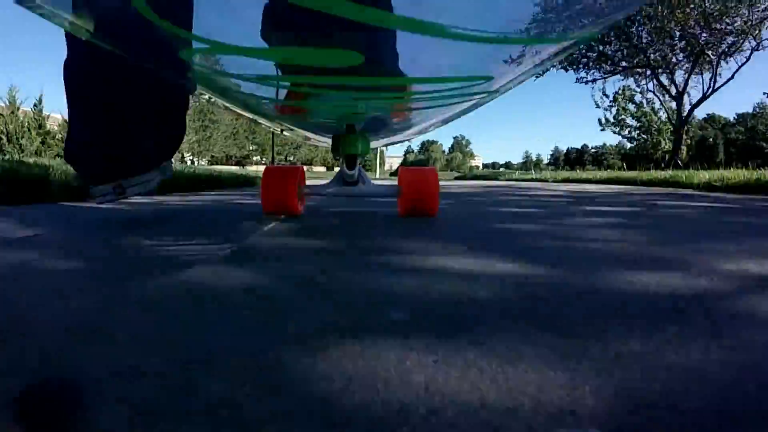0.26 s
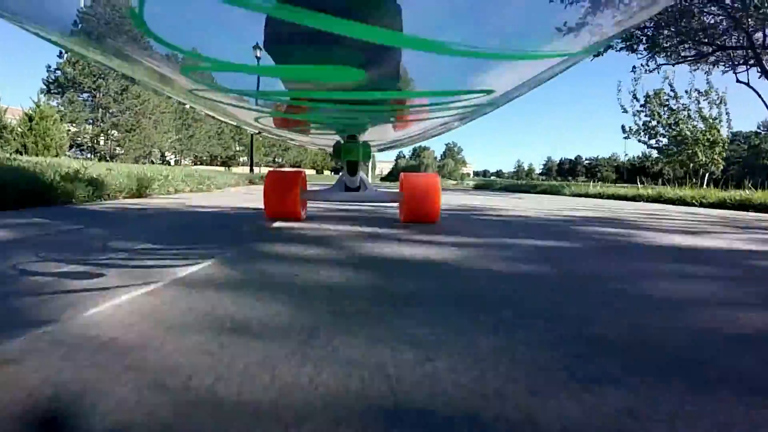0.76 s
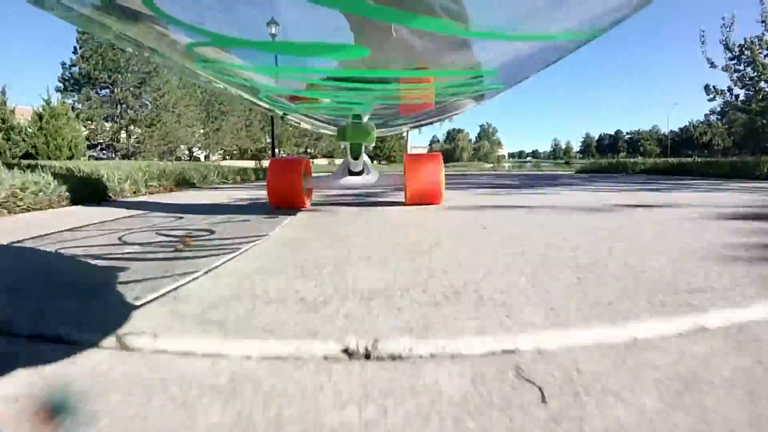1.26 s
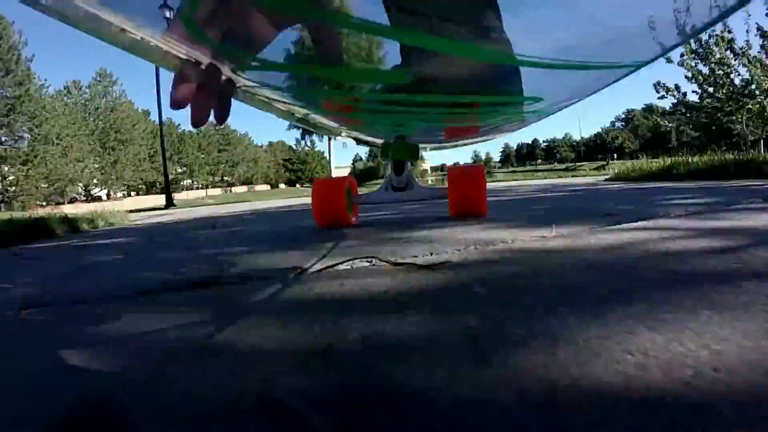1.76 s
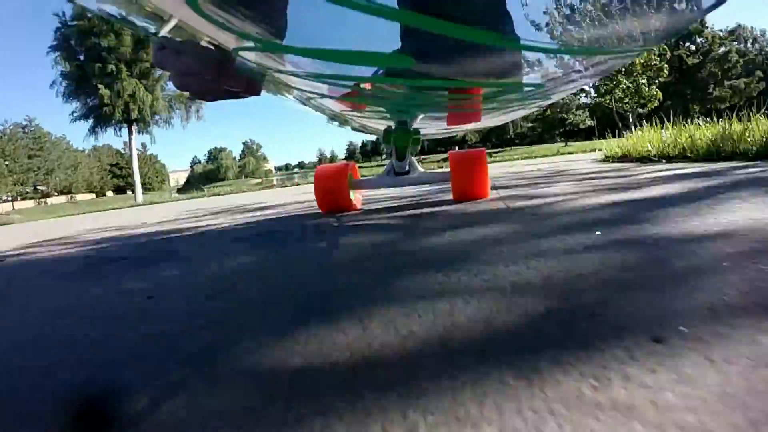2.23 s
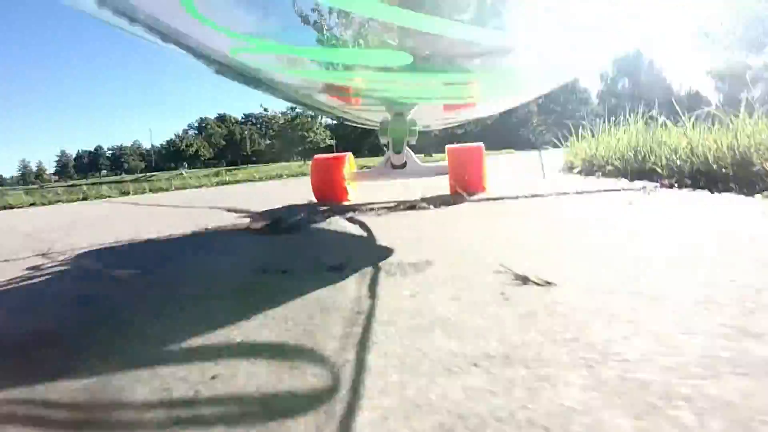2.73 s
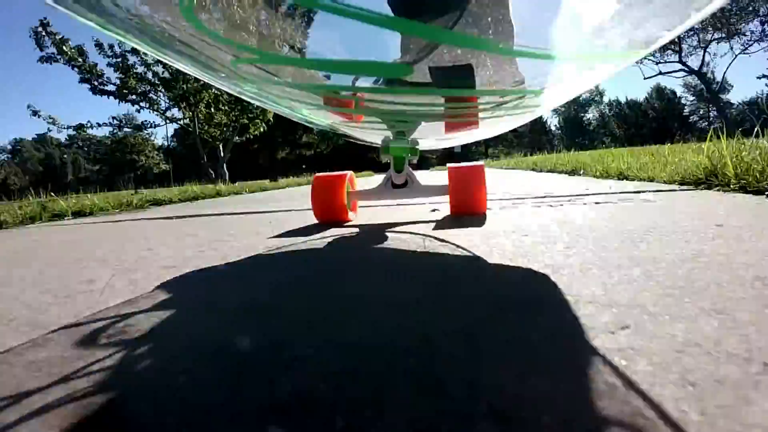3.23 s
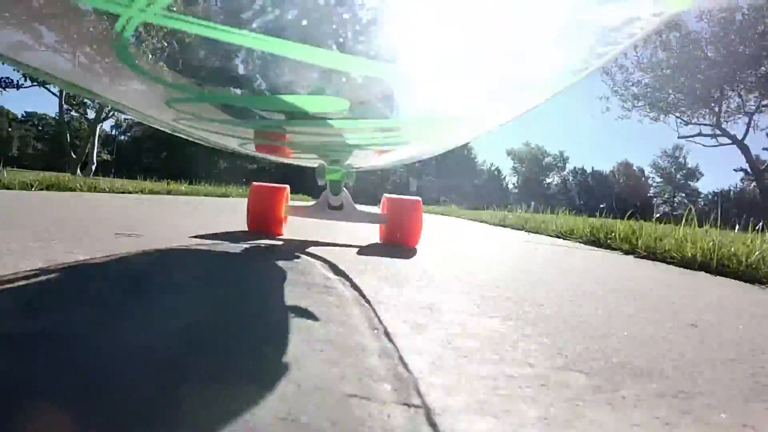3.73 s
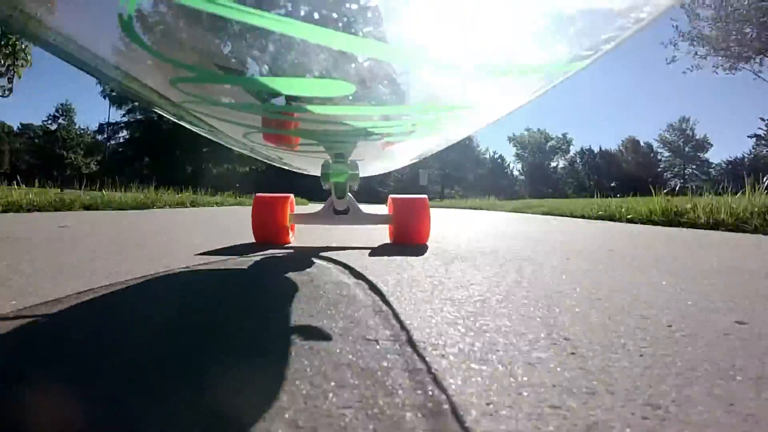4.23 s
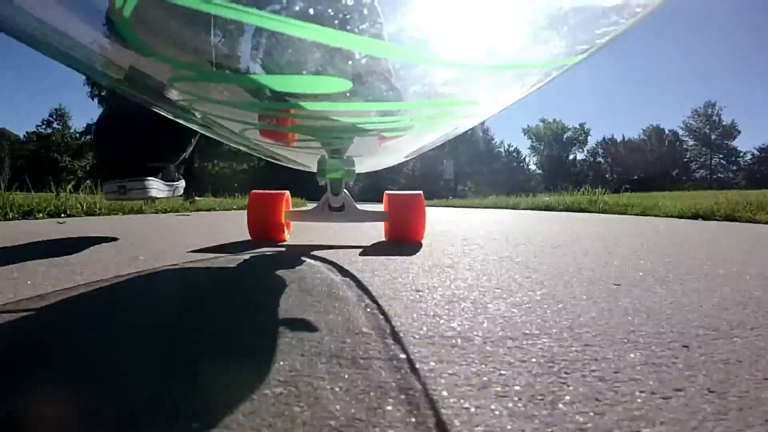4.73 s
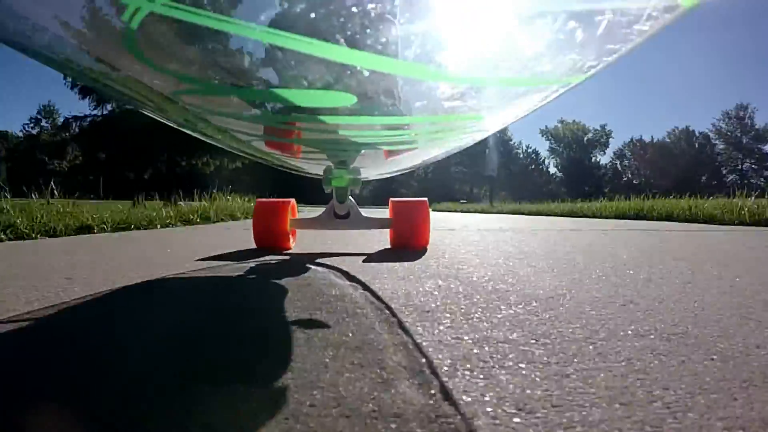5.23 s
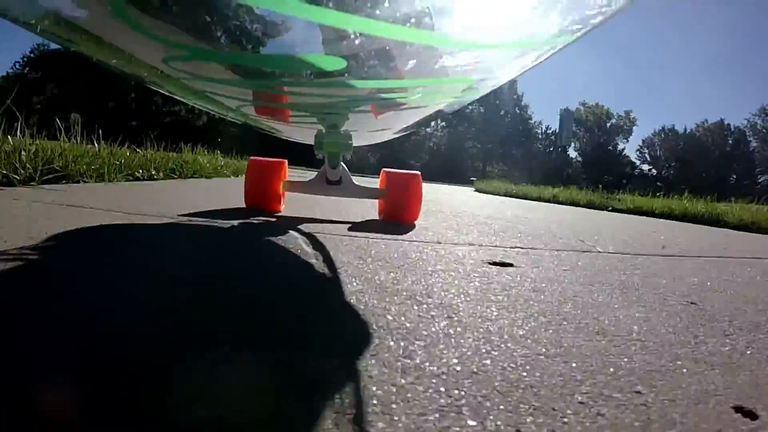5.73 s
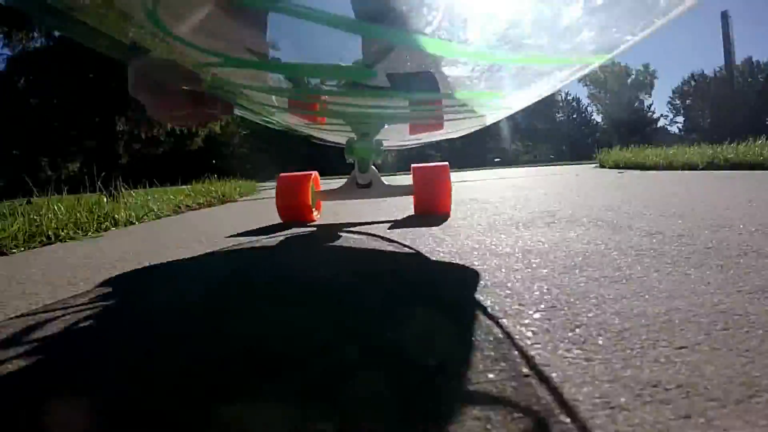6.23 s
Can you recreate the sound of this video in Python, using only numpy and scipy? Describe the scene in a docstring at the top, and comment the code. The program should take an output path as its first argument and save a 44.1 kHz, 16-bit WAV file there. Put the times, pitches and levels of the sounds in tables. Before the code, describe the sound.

A small camera clamped beneath a longboard hears hard wheels on slabbed concrete through the deck. At 0 seconds loose hardware clatters with a thump; a double blow lands around 0.26 and the roughly 225 hertz hum briefly climbs. Lumpy low rumble swells near 0.6, with thumps at 0.65 and 0.86. A faint, hoarse rising squeal passes at 1.0, joints hit at 1.2 and 1.4, and the hardest thump comes at 1.93. Tiny stones crack around 2.3-2.4 as grit hiss grows. Heavy knocks follow near 2.8, 3.0, 3.4 and 3.55, then a fainter, lower squeal at 3.7. Thuds resume at 4.0, a small stone ticks at 4.2, and knocks continue irregularly through 5.2, 5.9 and 6.3. Dry metallic clicks accompany impacts, with rapid chatter between. Rolling continues until about 6.5; blows clip and briefly duck everything.

```python
"""A longboard's hard wheels on slabbed concrete, from a small camera clamped under the deck, hearing all through it.
It opens on a clatter of loose hardware and a thump; a double blow follows at a quarter second and the hum rises.
A squeal follows at one second and the hardest thump near two; stones crack soon after, with a lower squeal
before four seconds and one more stone after it. Throughout, rough ground drums the deck and grit hisses;
joints thump it, loose hardware clicks and bounces, and the camera ducks under heavy blows and clips the peaks."""
import sys
import numpy as np
from scipy import signal
from scipy.fft import rfft, irfft, next_fast_len
from scipy.io import wavfile
from scipy.ndimage import map_coordinates

SR = 44100
rng = np.random.default_rng(int(sys.argv[2]) if len(sys.argv) > 2 else 0)


def wav_record(signal):
    """Record a signal, one row per channel, as 16-bit PCM in the file named by sys.argv[1]."""
    frames = np.transpose(np.atleast_2d(signal))
    bounded = np.clip(frames, -1, 1)
    # unit amplitude maps onto the largest positive 16-bit level
    quanta = np.round(bounded * 32767).astype(np.int16)
    wavfile.write(sys.argv[1], SR, quanta)


def volts_from_decibels(level):
    """Turn decibel levels (scalar or array-like) into linear amplitude factors."""
    exponent = np.asarray(level, float) / 20
    return 10 ** exponent


N = 285327


def unit(x):
    """Scales a signal to rms 1."""
    return x / np.sqrt(np.mean(x ** 2) + 1e-20)


def wobble(rate):
    """A smooth random curve with this many knots a second."""
    knots = rng.standard_normal(int(N * rate / SR) + 4)
    return map_coordinates(knots, [np.arange(N) * rate / SR])


def narrow(hz, width_hz):
    """Noise of rms 1 in a narrow band whose centre follows hz."""
    phase = 2 * np.pi * np.cumsum(hz) / SR
    return unit(wobble(width_hz) * np.cos(phase) + wobble(width_hz) * np.sin(phase))


def filtered(x, response):
    """Applies a complex response of frequency."""
    size = next_fast_len(N + SR // 2)
    return irfft(rfft(x, size) * response(np.fft.rfftfreq(size, 1 / SR)), size)[:N]


def placed(times, shapes):
    """Sums rows of samples at their start times."""
    index = np.round(np.asarray(times) * SR).astype(int)[:, None] + np.arange(shapes.shape[1])
    return np.bincount(np.clip(index, 0, N).ravel(), shapes.ravel(), N + 1)[:N]


def curves(rows):
    """Draws each column of a table over time, a value per sample."""
    s, *columns = np.transpose(rows)
    return [np.interp(np.arange(N) / SR, s, column) for column in columns]


# resonances of the deck over the camera: (frequency [Hz], width [Hz], level [dB])
DECK_MODES = [(45.4, 89, -17.5), (80.3, 31, -3), (108.6, 51.6, -3.5), (192.3, 79.3, -2.5), (348, 109, -8),
              (467, 78, -8.5), (778, 410, -20)]


def deck(f):
    """Causal sum of the deck's resonances; the heavy deck passes little treble."""
    modes = 0
    for k, (centre, width, db) in enumerate(DECK_MODES):
        band = 1j * f * width
        modes = modes + (-1) ** k * volts_from_decibels(db) * band / (centre ** 2 - f ** 2 + band)
    return modes / (1 + 1j * f / 1500) ** 2


def thud(times, db, push):
    """Pushes on the deck; a one-sample push of height 1 makes it swing to a peak of db."""
    peak = np.abs(filtered(np.ones(1), deck)).max()
    return filtered(placed(times, volts_from_decibels(db)[:, None] * push), deck) / peak


# what struck hardware rings with: (frequency [Hz], level [dB], time to fall 60 dB [s])
HARDWARE_MODES = [(792, 2, 0.014), (1177, 9.5, 0.0019), (1875, 1, 0.0059), (2395, -6, 0.0068),
                  (3150, 9, 0.0025), (4050, -0.5, 0.0045), (5253, -2.5, 0.0094), (7150, -11.5, 0.009),
                  (10660, -9, 0.0055), (15000, -17, 0.0024)]


def strikes(times, db, hard_db=0, size=500):
    """Each strike rings the hardware at its own pitches and strengths; soft ones touch longer and lose outer modes."""
    t = np.arange(size) / SR
    hz, mode_db, t60 = np.transpose(HARDWARE_MODES)
    chance = rng.standard_normal((len(times), 2, len(hz)))
    force_db = np.minimum(db + hard_db, 3)  # sets tone, not level
    octaves = np.log2(hz / 2500)
    dulling = .7 * np.maximum(octaves, 0) + .45 * np.maximum(-octaves, 0)
    soft_db = np.outer(np.minimum(force_db, 0), dulling)
    level = volts_from_decibels(db[:, None] + mode_db + soft_db + 3.3 * chance[:, 0])
    pitch = hz * np.exp(.08 * chance[:, 1])
    ring = 0
    for k in range(len(hz)):
        tone = np.sin(2 * np.pi * np.outer(pitch[:, k], t))
        ring = ring + (-1) ** k * level[:, k, None] * volts_from_decibels(-60 * t / t60[k]) * tone
    contact_s = .00006 * volts_from_decibels(-.45 * force_db)[:, None]
    return placed(times, ring * (1 - np.exp(-t / contact_s)) ** 3)


# wheels drop over slab joints and bumps, levels ahead of the camera: (time [s], level [dB])
JOINTS = [(0.022, -7), (0.255, 1), (0.272, 4), (0.638, -4.5), (0.672, -1.5), (0.864, 2.5), (1.202, -1.5),
          (1.384, 3), (1.752, -3.5), (1.93, 7), (2.433, -5.5), (2.768, 3.5), (2.96, 4.5), (3.367, -1),
          (3.384, 2), (3.554, 5), (4.032, 3.5), (4.237, -0.5), (4.29, 0), (4.588, -3.5), (4.774, -9.5),
          (5.003, -8), (5.169, 2.5), (5.397, 1), (5.527, -2.5), (5.763, -12), (5.781, -6.5), (5.914, 3.5),
          (6.155, -4.5), (6.308, 1.5)]


def bumps(count=30):
    """A soft push through the wheel thumps the deck and shakes a short dense rattle out of the hardware."""
    s, db = np.transpose(JOINTS)
    t = np.arange(SR // 50) / SR
    rise_s = .0004 * np.exp(.4 * rng.standard_normal((len(s), 1)))
    u = t / rise_s
    push = u * np.exp(-u)
    push = push / push.sum(axis=1, keepdims=True)
    draw = rng.random((len(s), 2, count))
    rattle_s = s[:, None] - .004 + 0.033 * draw[:, 0]
    rattle_db = db[:, None] - 13 - 8 * draw[:, 0] - 10 * draw[:, 1]  # dying away
    return thud(s, db, push) + strikes(rattle_s.ravel(), rattle_db.ravel())


KNOCK_DB = 0.5  # level of a knock's push over its strike, before a push factor

# single clicks of loose hardware close to the camera, loud and faint, levels ahead of it: (time [s], level [dB])
SINGLE_CLICKS = [(0.0029, -1.5), (0.0113, -4.5), (0.021, -3.5), (0.255, -4), (0.2595, -5.5), (0.2667, -5),
                 (0.277, -4.5), (0.2854, -3.5), (0.2894, -4), (0.657, -0.5), (0.675, -1.5), (0.8664, -3.5),
                 (0.8736, -1), (0.88, -10.5), (0.8934, -3), (0.898, -11), (0.9116, -7), (1.0148, -15),
                 (1.2057, -8.5), (1.387, -4.5), (1.399, -3.5), (1.5872, -14), (1.7338, -9.5), (1.751, -6.5),
                 (1.9344, -5), (1.95, -6), (1.953, -1), (1.967, -3), (2.2952, -15), (2.4264, -13),
                 (2.4403, -8), (2.469, -8), (2.7664, -5), (2.7834, -2), (2.7998, -7), (2.9394, -16.5),
                 (2.962, -6), (2.9673, -6), (2.977, -2), (2.984, -3.5), (3.0143, -9), (3.36, -15),
                 (3.3724, -0.5), (3.392, -1), (3.407, -6), (3.5304, -18), (3.5573, -3), (3.5618, -2.5),
                 (3.578, -11), (4.026, -11.5), (4.0442, -0.5), (4.0568, -6.5), (4.2441, -3.5), (4.252, -5),
                 (4.2739, -9), (4.584, -9), (4.5938, -6), (4.6018, -3), (4.6121, -4.5), (4.759, -14),
                 (4.771, -3.5), (4.7795, -4), (4.786, -12.5), (5.007, -3.5), (5.0146, -5), (5.0225, -3.5),
                 (5.154, -27), (5.1694, -4.5), (5.177, -3.5), (5.3628, -10.5), (5.3893, -10),
                 (5.3999, -13.5), (5.4339, -11.5), (5.5318, -1), (5.539, -11.5), (5.764, -7),
                 (5.7691, -9.5), (5.7839, -10.5), (5.9212, -0.5), (5.938, -18), (6.1706, -10), (6.3151, -2)]


def clicks():
    """Clicks ring the hardware, each with a few weaker rebounds and a small knock on the deck."""
    s, db = np.transpose(SINGLE_CLICKS)
    draw = rng.random((len(s), 2, 4))
    rebound_s = s[:, None] + 0.00068 + 0.0059 * draw[:, 0]
    rebound_db = db[:, None] - 7 - 8 * draw[:, 0] - 8 * draw[:, 1]
    rebounds = strikes(rebound_s.ravel(), rebound_db.ravel())
    return strikes(s, db) + rebounds + thud(s, db + KNOCK_DB, 0.75)


# spells of bouncing on the deck, levels ahead of the camera:
# (first bounce time [s], last bounce time [s], first level [dB], last level [dB])
BOUNCING_SPELLS = [(0.1262, 0.178, -13.5, -23), (0.15, 0.189, -22, -17.5), (0.22, 0.237, -21.5, -19),
                   (0.303, 0.3778, -9.5, -9), (0.5812, 0.645, -9, -20), (0.693, 0.745, -6.5, -13.5),
                   (0.785, 0.844, -16, -12.5), (0.949, 0.9745, -14, -18), (1.222, 1.2403, -8.5, -10.5),
                   (1.29, 1.348, -17, -14), (1.415, 1.506, -15.5, -21.5), (1.5363, 1.5534, -17.5, -16.5),
                   (1.77, 1.806, -11, -12), (1.9806, 1.999, -13, -16), (2.488, 2.5146, -18, -30),
                   (3.0429, 3.061, -22, -26), (3.137, 3.199, -22.5, -20.5), (3.23, 3.345, -20, -21.5),
                   (3.444, 3.457, -18, -22.5), (3.594, 3.628, -17, -24), (3.9787, 4.003, -21.5, -27),
                   (4.303, 4.33, -21, -22), (4.381, 4.467, -20.5, -33), (4.5156, 4.568, -18, -18),
                   (4.667, 4.719, -16, -23), (5.029, 5.095, -11.5, -18.5), (5.232, 5.304, -19, -15),
                   (5.329, 5.354, -17.5, -12), (5.5742, 5.5865, -17.5, -16.5), (5.651, 5.754, -29, -21),
                   (5.876, 5.891, -17.5, -22), (5.975, 6.01, -22.5, -28), (6.155, 6.18, -9, -19.5)]


def chatter():
    """The loose part bounces unevenly about sixty times a second, with quick rebounds, tapping the deck."""
    bounce_s = .0165
    spells = []
    for first, last, first_db, last_db in BOUNCING_SPELLS:
        gaps = max(round((last - first) / bounce_s), 1)
        spells.append(np.linspace((first, first_db), (last, last_db), gaps + 1))
    times, db = np.concatenate(spells).T
    draw = rng.standard_normal((len(times), 6))
    times = times + .0008 * draw[:, 0]
    db = db + 2.4 * draw[:, 1]
    rebound_s = times + .0035 + .0012 * draw[:, 4]
    rebound_db = db - 7 + 3 * draw[:, 5]
    # a weaker bounce at an uneven moment between two regular ones
    between_s = times + bounce_s * (.45 + 0.24 * draw[:, 2])
    between_db = db - 9.5 + 3 * draw[:, 3]
    hard_db = -7  # softer in tone than single clicks of the same level
    bouncing = strikes(times, db, hard_db)
    bouncing += strikes(rebound_s, rebound_db, hard_db)
    bouncing += strikes(between_s, between_db, hard_db)
    return bouncing + thud(times, db + KNOCK_DB, 0.87)


# small stones under a wheel, levels ahead of the camera: (time [s], level [dB])
SMALL_STONES = [(2.3226, -22.5), (2.3973, -25), (4.178, -27.5)]


def stones():
    """Small stones crack under a wheel as bright strikes, keeping all the hardware's outer modes."""
    s, db = np.transpose(SMALL_STONES)
    return strikes(s, db, hard_db=25)


# brief hoarse squeals, levels ahead of the camera:
# (time [s], length [s], start frequency [Hz], end frequency [Hz], level [dB])
FRICTION = [(1.021, 0.076, 4050, 4720, -41), (3.675, 0.058, 1690, 2050, -47)]


def squeals():
    """Friction squeals as short rising bands of noise."""
    t = np.arange(N) / SR
    out = np.zeros(N)
    for s, length, start_hz, end_hz, db in FRICTION:
        u = np.clip((t - s) / length, 0, 1)
        hz = start_hz + (end_hz - start_hz) * u
        out += volts_from_decibels(db) * np.sin(np.pi * u) * narrow(hz, width_hz=900)
    return out


# the deck's hum, higher for a moment early on: (time [s], frequency [Hz], level over the rumble [dB])
DECK_HUM = [(0, 224.1, 4), (0.3, 280, 0.5), (0.52, 340, 0), (0.621, 225.6, -23), (1.05, 227.4, 12.5),
            (1.3, 221.7, -2), (1.6, 228, 9.5), (1.9, 233.6, -5), (2.4, 242.6, 0.5), (3.999, 229.7, -3),
            (4.8, 257.7, -6.5), (5.4, 228.6, 2.5), (6.47, 229.8, 2.5)]


def drumming(lump):
    """Uneven concrete shakes the deck's resonances with lumpy noise and makes it hum in a wandering narrow band."""
    hum_hz, hum_db = curves(DECK_HUM)
    shake = volts_from_decibels(2 * lump + 2 * wobble(70))
    rumble = unit(filtered(shake * rng.standard_normal(N), deck))
    hum = narrow(hum_hz * np.exp(.04 * wobble(12)), width_hz=65)
    return rumble + volts_from_decibels(hum_db + 3.6 * lump) * hum


# colour of the grit under the wheels: (frequency [Hz], relative level per Hz [dB])
GRIT_COLOUR = [(400, -2), (700, 2.5), (1300, -3), (1800, 0), (2800, -9), (4600, -14), (5300, -9),
               (6200, -16), (9700, -29), (11150, -19), (12500, -31), (15000, -70)]


def grit(lump):
    """Grit hisses under the wheels: coloured noise that flickers quickly and swells with the lumps."""
    hz, db = np.transpose(GRIT_COLOUR)
    flicker = volts_from_decibels(.6 * lump + 2.6 * wobble(50) + 3 * wobble(400))
    noise = flicker * rng.standard_normal(N)
    return unit(filtered(noise, lambda f: volts_from_decibels(np.interp(np.log(f + 1), np.log(hz), db))))


# the ground passing under the board, levels ahead of the camera:
# (time [s], deck rumble level [dB], grit hiss level [dB])
GROUND = [(0, -29, -48), (0.12, -30.5, -52), (0.45, -25, -41.5), (0.6, -17, -43), (0.78, -21.5, -43.5),
          (1.1, -24.5, -43.5), (1.85, -26.5, -41.5), (2.12, -27, -44), (2.35, -21, -38.5), (2.74, -27, -37),
          (2.9, -25.5, -39.5), (3.2, -32, -45.5), (3.47, -23, -42), (3.799, -32, -51.5), (4.2, -23, -45.5),
          (4.9, -27, -45), (5.3, -21.5, -38), (5.65, -31, -46.5), (6.05, -27, -43), (6.47, -26.5, -39.5)]


def rolling():
    """The same lumps in the concrete drive the deck's drumming and the hiss of grit."""
    rumble_db, hiss_db = curves(GROUND)
    lump = wobble(18)
    return volts_from_decibels(rumble_db) * drumming(lump) + volts_from_decibels(hiss_db) * grit(lump)


def specks(count=450):
    """Hard specks of grit tick brightly at random moments, louder where the ground hisses more."""
    hiss_db = curves(GROUND)[-1]
    where, size = rng.random((count, 2)).T
    db = hiss_db[(where * N).astype(int)] + 1.5 - 3 * np.log(size)  # a few stand well out
    return strikes(where * N / SR, db, hard_db=14)


def scene():
    """Everything reaches the camera through the deck."""
    return (bumps() + clicks() + chatter() + stones() + squeals() + rolling() + specks())[None]


def low_pass(x):
    """Removes everything above the highest recorded frequency."""
    return signal.sosfilt(signal.butter(12, 16360, fs=SR, output="sos"), x)


def record(dry):
    """The camera ducks by its recent mean power, clips peaks and cuts deep bass and top treble."""
    keep = np.exp(-1 / (.09 * SR))  # 90 ms averaging
    power = signal.lfilter([1 - keep], [1, -keep], dry ** 2)
    knee_power = volts_from_decibels(-18.25) ** 2
    x = 1.31 * dry / np.sqrt(1 + power / knee_power)
    x = x / (1 + np.abs(x) ** 8) ** (1 / 8)  # peaks flatten just below full scale
    x = filtered(x[0], lambda f: 1j * f / (30 + 1j * f) / (1 + (f / 15400) ** 30))[None]
    return low_pass(x)


dry = scene()
out = record(dry)
wav_record(out)
```